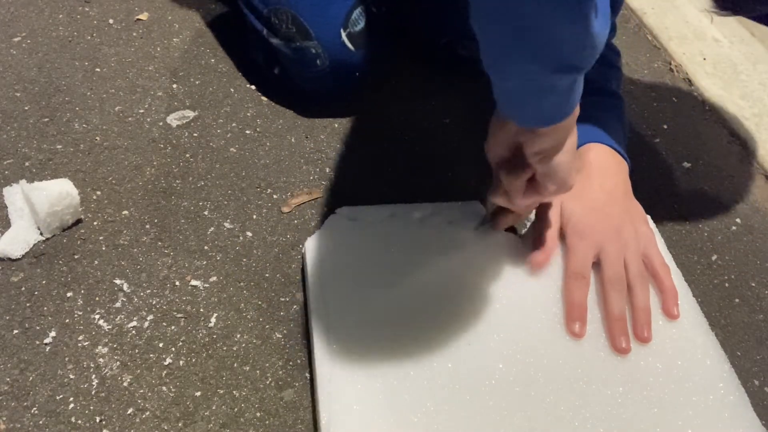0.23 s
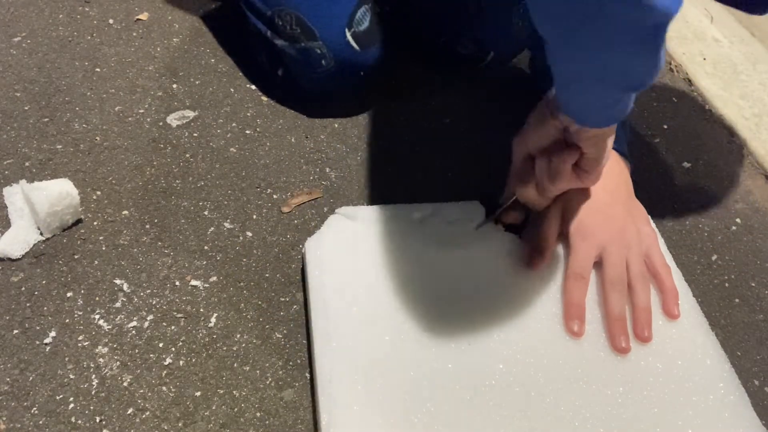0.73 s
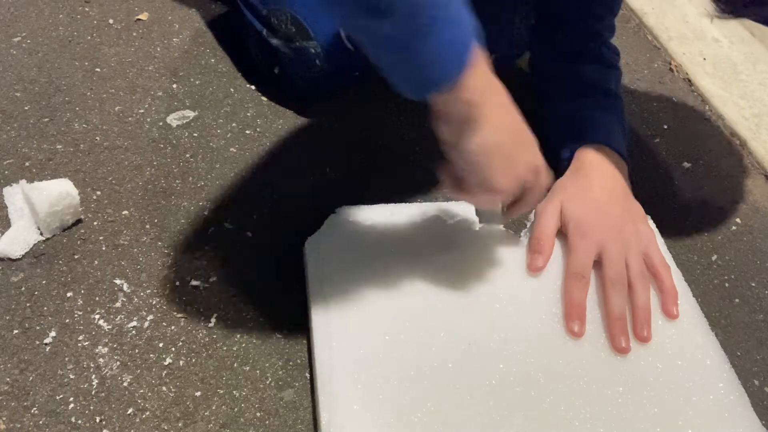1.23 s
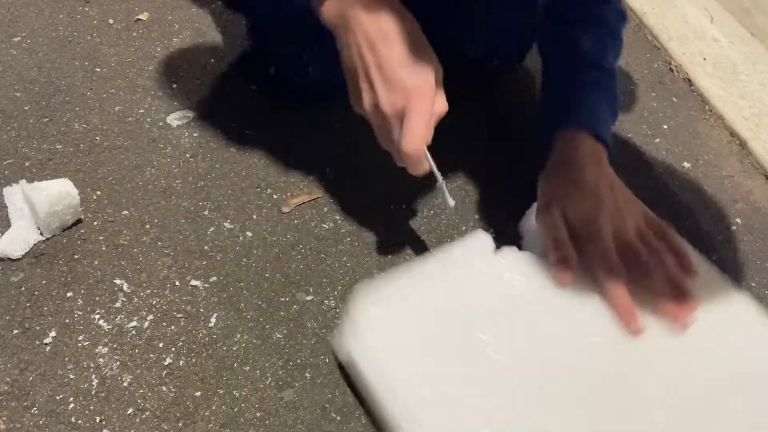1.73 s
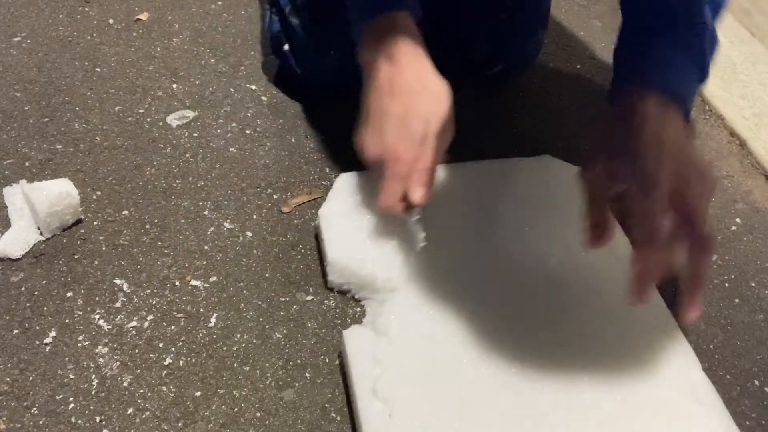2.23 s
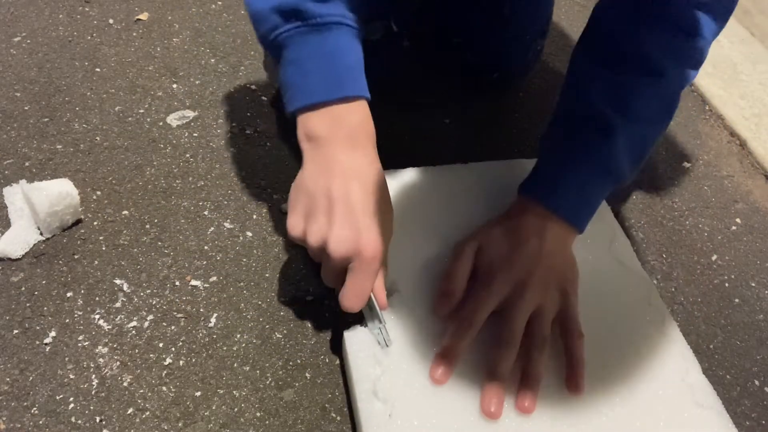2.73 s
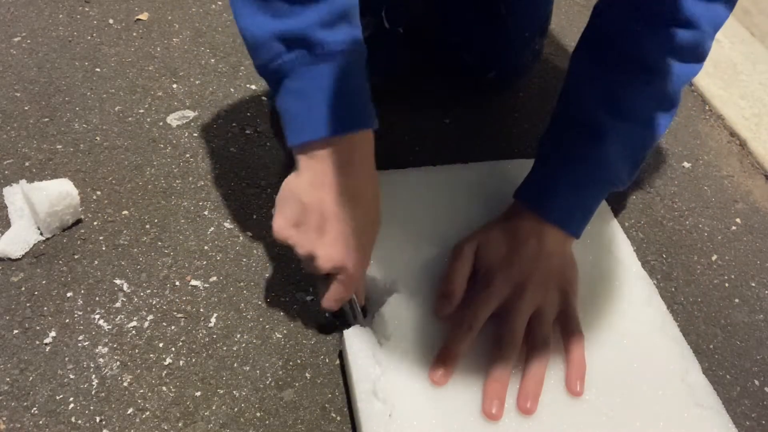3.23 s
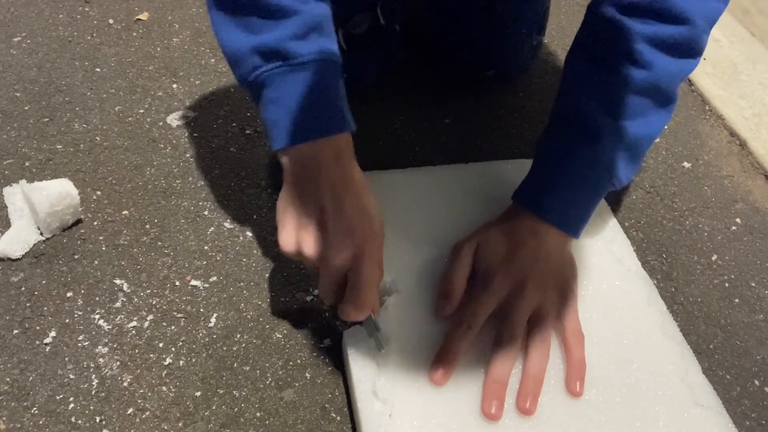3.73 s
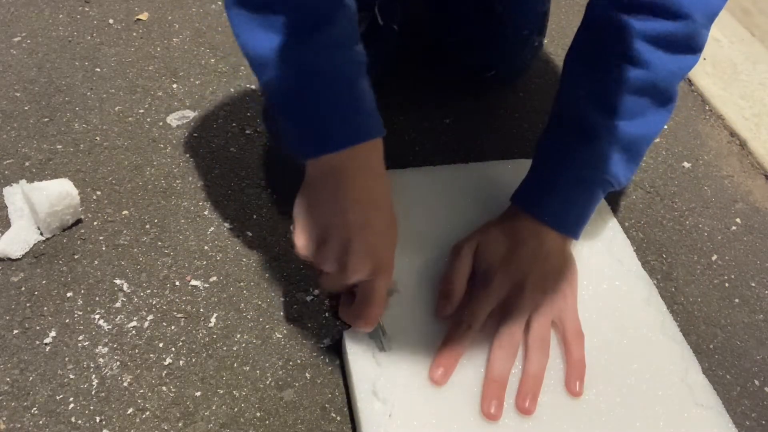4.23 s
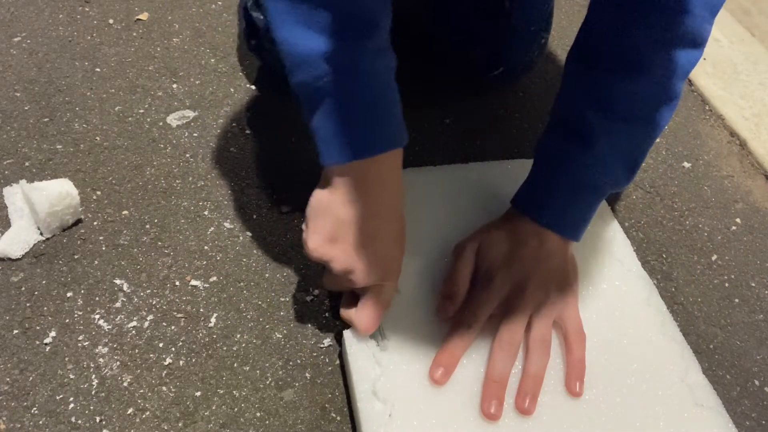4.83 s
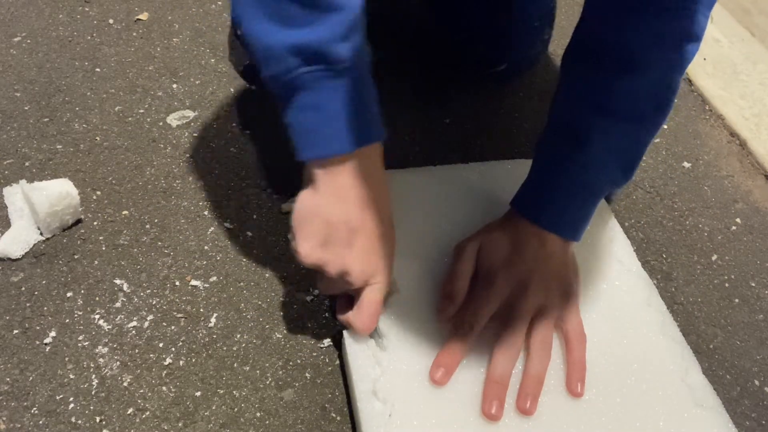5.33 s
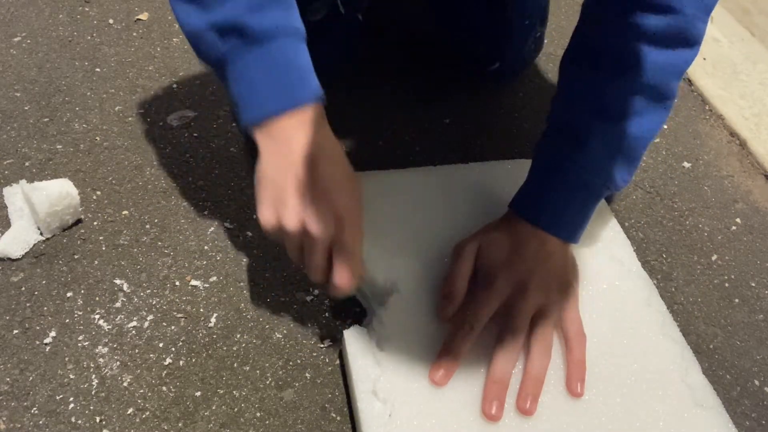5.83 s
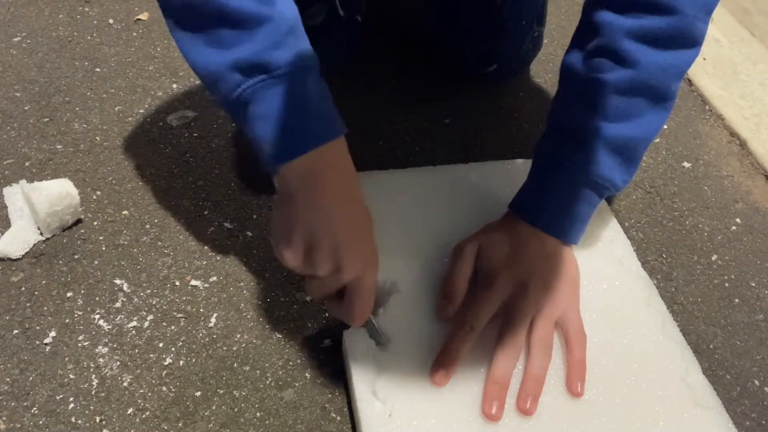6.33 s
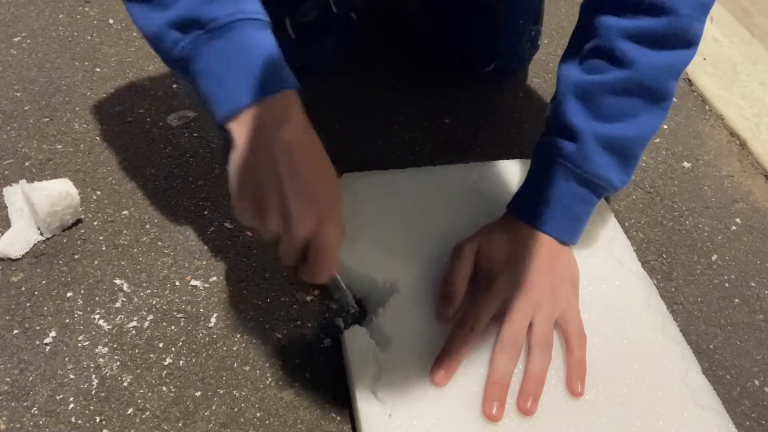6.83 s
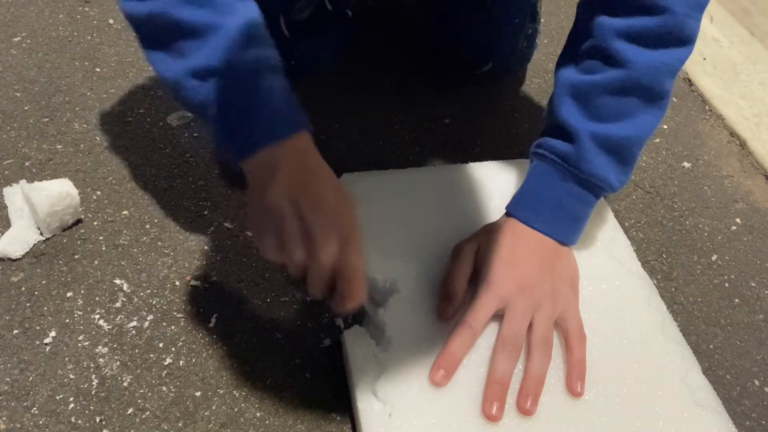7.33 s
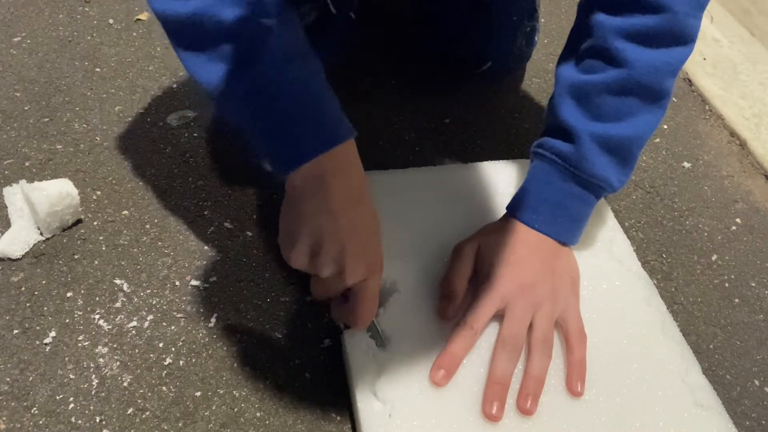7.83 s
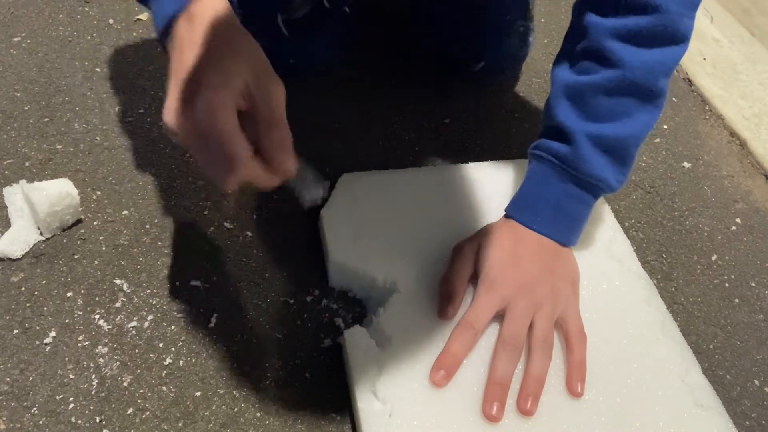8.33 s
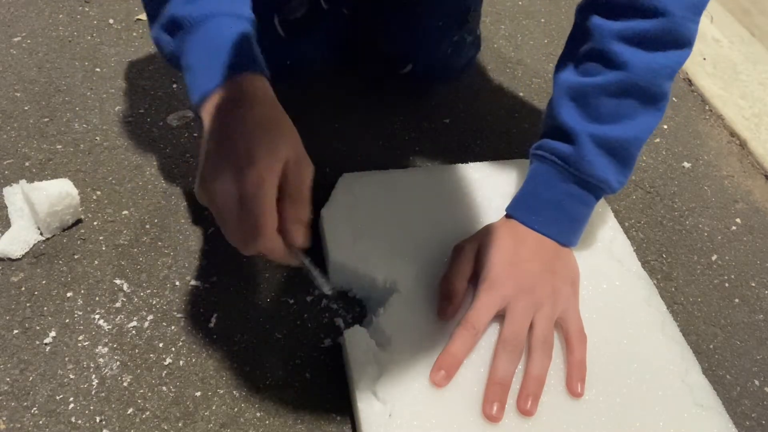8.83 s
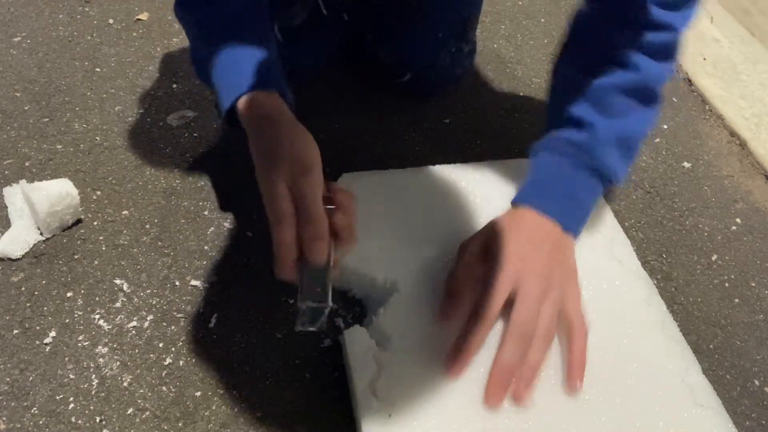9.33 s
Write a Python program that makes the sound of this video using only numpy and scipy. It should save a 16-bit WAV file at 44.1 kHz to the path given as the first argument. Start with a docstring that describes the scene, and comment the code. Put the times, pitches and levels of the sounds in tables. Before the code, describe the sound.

Close up, fingers and blade pick at a polystyrene board with light crackles, snaps and little hollow creaks. The board is dragged round over gritty asphalt with a resonant scrape, then sawn in irregular crunchy strokes and sharp rips. It thins to quiet, with faint knife ticks and a soft nudge. Slight roofed echo, low rumble, stereo microphone.

```python
"""Box cutter in polystyrene

A box cutter saws through a thick polystyrene board on asphalt, under a roof that echoes a little.
Bursting beads (random clicks) make the crackling drag, snaps and rips; grit clicks through resonances make
the board slide when it is turned once and nudged at the end. Stuttering tones are creaks of the flexing foam,
decaying modes the ticks of the lifted knife; filtered noise gives sleeve, low buffeting, bumps and room air."""
import sys
import numpy as np
from scipy import signal
from scipy.fft import rfft, irfft, next_fast_len
from scipy.io import wavfile

SR = 44100
rng = np.random.default_rng(int(sys.argv[2]) if len(sys.argv) > 2 else 0)


def pcm_store(signal):
    """Save signal as 16-bit PCM."""
    levels = np.round(np.clip(np.atleast_2d(signal), -1, 1) * 32767)
    wavfile.write(sys.argv[1], SR, levels.astype(np.int16).T)


N = 423360
TIME = np.arange(N) / SR
SIZE = 2 * next_fast_len(N // 2 + SR // 2)   # padded transform length
HZ = np.maximum(np.arange(SIZE // 2 + 1) * SR / SIZE, 1)


def from_db(db):
    """Logarithmic level: decibels to amplitude gain."""
    return 10 ** (np.asarray(db) / 20)


def rms_one(x):
    """Power normalisation: scale to rms 1."""
    return x / np.sqrt(np.mean(x ** 2) + 1e-20)


def in_time(rows):
    """Linear interpolation: the columns of a curve at every sample."""
    s, *columns = np.transpose(rows)
    return [np.interp(TIME, s, c) for c in columns]


def during(rows):
    """Gating: 1 from the first row's time to the last row's, else 0."""
    return (TIME >= rows[0][0]) & (TIME <= rows[-1][0])


def at_hz(points, hz=HZ):
    """Logarithmic frequency scale: read a table on a log-frequency axis."""
    table_hz, values = np.transpose(points)
    return np.interp(np.log(hz), np.log(table_hz), values)


def bumps(modes):
    """Resonance: summed bell-shaped lifts, in dB, one for each mode."""
    return sum(db / (1 + (2 * (HZ - hz) / width) ** 2) for hz, width, db in modes)


def body(x, colour_db):
    """Minimum-phase filtering: causal colour from the cepstrum; white noise keeps its level."""
    cepstrum = irfft(np.log(rms_one(from_db(colour_db))))
    cepstrum[1:SIZE // 2] *= 2   # fold onto positive time
    cepstrum[SIZE // 2 + 1:] = 0
    response = np.exp(rfft(cepstrum))
    return irfft(rfft(x, SIZE) * response)[..., :N]


def band(x, hz, kind):
    """Band limiting: second-order Butterworth filter."""
    return signal.sosfilt(signal.butter(2, hz, kind, fs=SR, output="sos"), x + 1e-18)


def split(x, hz):
    """Crossover: the parts below and above, which add up to a flat response."""
    return [band(band(x, hz, kind), hz, kind) for kind in ("low", "high")]


def drift(rate):
    """Random modulation: smooth wandering of spread 1, with this many knots a second."""
    knots = rng.standard_normal(N // 10)
    return rms_one(np.interp(TIME * rate, np.arange(len(knots)), knots))


def swells(rows, half_s):
    """Gaussian envelope: a bell-shaped swell for each (s, dB)."""
    return sum(from_db(db) * np.exp(-((TIME - s) / half_s) ** 2) for s, db in rows)


def grains(per_s, spread_db):
    """Shot noise: random clicks of very uneven size and either sign; rms 1."""
    sizes = from_db(spread_db * np.minimum(rng.exponential(1, N), 4))
    happens = rng.random(N) < per_s / SR
    return rms_one(sizes * rng.choice([-1, 1], N) * happens)


def avalanche(fractures, s, swell, fade, squareness=1.3):
    """Fracture avalanche: clicks build up to a peak and die; returns their place and the clicks."""
    span = slice(max(int((s - 5 * swell) * SR), 0), int((s + 5 * fade) * SR) + 2)
    t = TIME[span] - s
    shape = np.exp(-np.abs(t / np.where(t < 0, swell, fade)) ** squareness)
    clicks = fractures[span] * shape
    return span, clicks * np.sqrt(np.sum(shape ** 2) / (np.sum(clicks ** 2) + 1e-12))


# timbre along the cut; dragging takes a share of the treble column:
# t/s, f/Hz of the foam flap beside the blade, relative bass level/dB, relative treble level/dB
CUT = [(.3, 1520, -4, 2.5), (1.2, 1470, 4.5, -2.5), (2.55, 1300, 4.5, -9.5), (2.75, 1330, -5.5, -2),
       (3.1, 1350, -1.5, -1.5), (3.3, 1500, 7.5, -6), (3.6, 1880, 7.5, 4), (3.9, 2210, -8.5, -4),
       (4.3, 2500, -18.5, -3), (4.6, 2670, -40.5, -0.5), (5.0, 2740, -20, 2), (6.0, 1550, 7, -4),
       (6.15, 1630, -2.5, -2), (6.4, 2730, -7, 1), (6.97, 2180, 3.5, -1), (7.3, 2100, 10, -13),
       (7.52, 1940, -16, -7), (7.87, 4600, 3, 1)]
TEAR_DB, TEAR_DULLING = -23.5, 0.2   # typical snap or rip/dB; dB of treble lost per dB stronger


def tearing(tears, thud_db, treble_db, judder_db, squareness):
    """Brittle fracture: bead chains burst at each (s, dB, swell s, fade s); strong tears are duller."""
    fractures = grains(per_s=13000, spread_db=3.5) * from_db(judder_db * drift(450))
    burst, spit = np.zeros((2, N))
    for s, db, swell, fade in tears:
        span, clicks = avalanche(fractures, s, swell, fade, squareness)
        burst[span] += clicks * from_db(db)
        spit[span] += clicks * from_db(db - TEAR_DULLING * (db - TEAR_DB))
    _, bass, treble = in_time(CUT)
    thud = split(burst * from_db(bass + thud_db), 760)[0]
    lower = thud + split(burst, 710)[1]
    upper = split(spit * from_db(treble + treble_db), 3400)[1]
    return split(lower, 5800)[0] + upper


# rips, where the stuck blade breaks through: t/s at the peak, relative level/dB, length/s
RIPS = [(1.228, -37, .013), (2.514, -35.5, 0.016), (2.8405, -29, 0.0066), (2.874, -24, 0.0052),
        (2.901, -13.5, 0.025), (2.947, -27.5, 0.0055), (3.105, -14.5, 0.018), (3.688, -30, 0.0087),
        (3.831, -14.5, 0.0093), (3.965, -11, .02), (4.113, -18.5, 0.0058), (4.131, -20, 0.0042),
        (4.459, -26.5, 0.013), (4.982, -29, 0.011), (6.034, -18.5, 0.0065), (6.119, -21, 0.024),
        (6.414, -14, 0.019), (7.311, -32, 0.0057), (7.881, -29, 0.024)]
RIP_SWELL_SHARE = 0.65   # share of its length for which a rip builds up


def ripping(level_db):
    """Stick-slip release: the stuck blade lets go; the fractures multiply, peak and die away."""
    rips = [(s, db, RIP_SWELL_SHARE * length, (1 - RIP_SWELL_SHARE) * length) for s, db, length in RIPS]
    return from_db(level_db) * tearing(rips, thud_db=0.0, treble_db=7.5, judder_db=2.0, squareness=1.8)


# snaps, where a few beads crack at once: t/s at the peak, relative level/dB
SNAPS = [(0.0757, -36.5), (0.119, -42), (0.1554, -30.5), (0.2557, -22.5), (0.2818, -20.5), (0.379, -32),
         (0.48, -27.5), (.488, -21), (1.0489, -30), (1.0627, -30), (2.6009, -25.5), (2.711, -29),
         (2.7366, -10.5), (2.7429, -11), (3.064, -28), (3.095, -21), (3.283, -29), (3.314, -25.5),
         (3.585, -27), (3.664, -44), (3.7067, -25), (3.7733, -26), (3.8006, -19.5), (3.8734, -24),
         (3.8861, -22.5), (3.9118, -28.5), (3.95, -7), (4.0721, -31.5), (4.107, -16), (4.24, -20.5),
         (4.257, -14.5), (4.439, -43), (4.481, -24.5), (4.529, -24.5), (4.5888, -22), (4.6565, -22.5),
         (4.6639, -11), (4.7304, -37), (4.7449, -23.5), (4.813, -20), (4.835, -21), (4.963, -33.5),
         (4.9705, -19.5), (4.9921, -29.5), (5.023, -25), (5.1378, -33.5), (5.9907, -21.5), (6.0636, -20),
         (6.087, -24), (6.27, -32.5), (6.319, -34), (6.3796, -21), (6.3865, -16.5), (6.9688, -19),
         (7.0604, -25.5), (7.3568, -28), (7.407, -13.5), (7.4167, -16), (7.459, -26), (7.521, -17.5)]
SNAP_SWELL_S, SNAP_FADE_S = .0006, .0016


def snapping(level_db):
    """Impulsive fracture: a few beads crack ahead of the blade, with one sudden start and quick fade."""
    snaps = [(s, db, SNAP_SWELL_S, SNAP_FADE_S) for s, db in SNAPS]
    return from_db(level_db) * tearing(snaps, thud_db=-2.5, treble_db=6.0, judder_db=-1.0, squareness=1.3)


def scattered(clicks, smear_s, count=6):
    """Multipath scattering: each fracture takes one of a few random paths and is smeared briefly."""
    t, route = TIME[:SR // 200], rng.integers(0, count, N)
    paths = rng.standard_normal((count, len(t))) * np.exp(-t / smear_s)
    return rms_one(sum(signal.oaconvolve(clicks * (route == k), path)[:N] for k, path in enumerate(paths)))


# strokes of blade or fingers through the foam: start t/s, end t/s, relative level/dB
DRAG = [(0.042, 0.098, -40.5), (0.128, 0.201, -49), (0.232, 0.292, -41), (0.34, 0.595, -44),
        (0.659, 0.846, -53), (0.856, 1.097, -44), (1.139, 1.257, -55), (2.524, 2.545, -42.5),
        (2.582, 2.656, -38.5), (2.705, 2.804, -38), (2.827, 2.969, -39.5), (3.009, 3.208, -43.5),
        (3.225, 3.344, -36), (3.663, 3.709, -33), (3.768, 3.933, -41.5), (4.084, 4.185, -41.5),
        (4.22, 4.306, -34), (4.345, 4.388, -37), (4.434, 4.526, -40), (4.574, 4.709, -40),
        (4.73, 5.03, -40), (5.106, 5.345, -52), (5.358, 5.444, -41), (5.841, 5.9, -44.5),
        (5.943, 6.154, -40), (6.255, 6.403, -45.5), (6.5, 6.612, -48), (6.625, 6.706, -41),
        (6.906, 7.01, -45), (7.044, 7.052, -31.5), (7.317, 7.535, -44.5), (7.568, 7.816, -51.5),
        (7.849, 7.904, -47.5)]
STROKE_DB, STROKE_DULLING = -40, 0.26   # typical stroke/dB; dB of treble lost per dB harder
PICKING_END_S = 1.4   # until then crumbs are only picked off the edge


def dragging(level_db, clump_db, hiss_db, picking_hiss_db, attack_s, release_s, treble_db, follows_cut,
             resting_db):
    """Frictional crackle: beads pop in clumps over hiss; light strokes are brightest, picking smoothest."""
    pops = grains(per_s=1900, spread_db=5.5) * from_db(clump_db * np.minimum(drift(130), 1.5))
    pops = scattered(pops, smear_s=0.00057, count=8)
    hiss = from_db(np.where(TIME < PICKING_END_S, picking_hiss_db, hiss_db))
    crackle = (pops + hiss * rng.standard_normal(N)) / np.hypot(1, hiss)
    pressure = from_db(resting_db) * during(DRAG)   # between strokes the hand still rubs the foam faintly
    bright = .5 * pressure
    for start, end, db in DRAG:
        span = slice(max(int((start - .05) * SR), 0), int((end + .05) * SR))
        t = TIME[span]
        before, after = np.maximum(start - t, 0), np.maximum(t - end, 0)
        stroke = from_db(db) * np.exp(-before / attack_s - after / release_s)
        pressure[span] += stroke
        bright[span] += stroke * from_db(-STROKE_DULLING * (db - STROKE_DB))
    _, _, treble = in_time(CUT)
    low, high = split(crackle, 4200)
    return from_db(level_db) * (low * pressure + high * bright * from_db(treble_db + follows_cut * treble))


def flap(x, lift, width_hz, size=256):
    """Moving resonance: a two-pole filter follows the cut's pitch, stepped block by block."""
    ring, state, pitch = np.zeros(N), np.zeros(2), in_time(CUT)[0]
    r = np.exp(-np.pi * width_hz / SR)   # pole radius
    zeros = [(1 - r * r) / 2, 0, (r * r - 1) / 2]
    for i in range(0, N, size):
        poles = [1, -2 * r * np.cos(2 * np.pi * pitch[i] / SR), r * r]
        ring[i:i + size], state = signal.lfilter(zeros, poles, x[i:i + size], zi=state)
    return x + lift * ring


# colour of the cut board: f/Hz, relative level/dB
CUT_COLOUR = [(80, -49.5), (200, -10.5), (300, -10), (450, -9), (700, -8.5), (1000, -0.5), (1400, -2),
              (2300, -4.5), (3200, -4), (4600, -5), (6500, -12.5), (9000, -7), (13500, -7.5), (15500, -19)]
# resonances of the cut board: f/Hz, width/Hz, lift/dB
CUT_MODES = [(500, 120, 6.5), (757, 78, 5), (1044, 180, -7.5), (1365, 310, 2.5), (1647, 38, 2.5),
             (2120, 130, 8.5), (2240, 100, -3.5), (2544, 200, 7), (3380, 70, 4), (4600, 130, -1.5),
             (7440, 4100, 3), (9480, 1000, 0.5)]


def cut_board(x):
    """Plate radiation: the flap and then the board's fixed resonances colour tears and drag."""
    return body(flap(x, lift=0.49, width_hz=520), at_hz(CUT_COLOUR) + bumps(CUT_MODES))


def rubbing(curve, crackle, treble_db):
    """Sliding friction: crackle under a movement whose strength and brightness change."""
    level, treble = in_time(curve)
    low, high = split(crackle, 3300)
    brightness = from_db(np.minimum(treble, 3) + treble_db)
    return during(curve) * from_db(level) * (low + high * brightness)


# the board sliding over the asphalt, one curve as it is turned, one as it is nudged:
# t/s, relative level/dB, treble level/dB relative to that (held to 3 at most, then offset)
SLIDES = [
    [(1.28, -73, 2), (1.45, -67, 30), (1.55, -36, -2.5), (1.66, -29, 0), (1.76, -33.5, -7),
     (1.84, -30, -3.5), (1.98, -28.5, -5.5), (2.03, -37, -2.5), (2.22, -53, -1.5), (2.48, -70.5, -23)],
    [(8.95, -78, -3.5), (9.22, -57, -4), (9.34, -43.5, -5), (9.39, -58.5, -4), (9.44, -53.5, 14),
     (9.48, -87, -3)],
]
# its edge catching on grit: t/s at the peak, relative level/dB
CATCHES = [(1.5664, -33), (1.638, -25.5), (1.654, -20.5), (1.693, -22.5), (1.7909, -29), (1.829, -23),
           (1.8895, -16.5), (1.933, -21.5), (1.978, -14), (2.01, -21.5), (2.057, -20.5), (2.087, -26.5),
           (2.171, -37), (9.333, -43), (9.429, -58)]
CATCH_SWELL_S, CATCH_FADE_S = 0.00396, .0055
# colour of the sliding board: f/Hz, relative level/dB
SLIDE_COLOUR = [(70, -35), (200, -10), (350, -17), (600, -15.5), (950, -8.5), (1350, -2), (2000, -7.5),
                (3000, -13), (4500, -10.5), (6500, -15), (9000, -7.5), (13500, -10.5), (15500, -19.5)]
# resonances of the sliding board: f/Hz, width/Hz, lift/dB
SLIDE_MODES = [(344.5, 17, 15), (631, 35, 0), (820, 36, 5), (1030, 16.4, 14.5), (1036, 110, -6),
               (1270, 65, 5), (1740, 28, 6.5), (2148, 76, 4), (2500, 53, 6.5), (3520, 49, 3.5)]


def sliding(level_db, catch_db, judder_db):
    """Forced plate vibration: grit rasps the underside; catches jolt the board like a drum skin."""
    grit = rms_one(grains(per_s=2600, spread_db=2.5) * from_db(judder_db * np.minimum(drift(130), 1.5)))
    rasp = from_db(level_db) * sum(rubbing(curve, grit, treble_db=6.5) for curve in SLIDES)
    jolts = np.zeros(N)
    for s, db in CATCHES:
        span, clicks = avalanche(grit, s, CATCH_SWELL_S, CATCH_FADE_S)
        jolts[span] += clicks * from_db(db + catch_db)
    contact = band(rasp, 330, "high") + band(jolts, 6000, "low")
    return body(contact, at_hz(SLIDE_COLOUR) + bumps(SLIDE_MODES))


# resonances as the board glides to rest: f/Hz, width/Hz, lift/dB
GLIDE_MODES = [(626, 340, 30.5), (1760, 400, 27.5), (3200, 390, 16.5), (4450, 720, 22.5)]
# when it sings: t/s at the peak, level/dB
GLIDE = [(2.35, -62)]
GLIDE_HALF_S = 0.16   # the swell falls to 1/e this far from its peak


def gliding():
    """Friction-excited resonance: the lightly rubbed board sings faintly in a few resonances."""
    return swells(GLIDE, GLIDE_HALF_S) * body(rng.standard_normal(N), bumps(GLIDE_MODES))


# hollow creaks of the flexing board: start t/s, nominal f/Hz, relative level/dB,
# length/s (loudest halfway through, with a tail beyond)
FLEX = [(.06, 423, -40.5, .014), (0.146, 417, -32, .012), (0.269, 422, -36.5, .013),
        (0.374, 492, -40, .018), (0.482, 500, -33, .013), (.583, 487, -39, .022),
        (0.862, 381.5, -48.5, .045), (0.989, 415.4, -52.5, .07), (3.131, 531, -56, .041),
        (5.401, 404, -41.5, .013)]
CREAK_SAG = .12   # share of its pitch, roughly, that a creak loses over its length


def flexing(level_db, sag, waver, rough_db, overtone_db):
    """Stick-slip creak: bent foam gives way in a stutter that sinks in pitch as the strain eases."""
    out, t, wobble = np.zeros(N), TIME[:SR // 4], drift(400)
    stutter = rms_one(from_db(rough_db * np.minimum(drift(300), 1.5)))
    for s, hz, db, length in FLEX:
        span = slice(int(s * SR), int(s * SR) + len(t))
        age = t / length
        pitch = hz * np.exp(sag * (.5 - np.minimum(age, 2)) + waver * wobble[span])
        phase = 2 * np.pi * np.cumsum(pitch) / SR
        tone = np.sin(phase) + from_db(overtone_db) * np.sin(3 * phase)
        envelope = 2 * age * np.exp(1 - 2 * age)
        out[span] += from_db(db + level_db) * envelope * stutter[span] * tone
    return out


# the loose blade in its handle: t/s, relative level/dB, pitch ratio to the modes [1]
TICKS = [(8.0732, -43, 1), (8.613, -49.5, 0.98), (8.7715, -40, 1), (8.9668, -51, .93),
         (9.0289, -45.5, 1.06)]
# modes of the knife: f/Hz before the pitch ratio, relative level/dB, t60/s
KNIFE = [(1850, -20, 0.025), (2025, 7.5, 0.029), (2100, -26, 0.018), (2990, -12, 0.028), (4290, 7.5, 0.016),
         (6140, -1, 0.016), (6900, -9, 0.037)]


def knife(level_db, rattle_db, rattle_t60):
    """Modal decay: each tick sums the knife's dying modes, of varied strengths, and a noisy rattle."""
    out, t = np.zeros(N), TIME[:SR // 10]
    for s, db, pitch in TICKS:
        ring = np.zeros(len(t))
        for hz, mode_db, t60 in KNIFE:
            strength = from_db(mode_db + rng.normal(0, 1.1) - 60 * t / t60)
            ring += strength * np.sin(2 * np.pi * pitch * hz * t)
        rattle = band(rng.standard_normal(len(t)), 10650, "low")
        ring += rattle * from_db(rattle_db - 60 * t / rattle_t60)
        out[int(s * SR):int(s * SR) + len(t)] += from_db(db + level_db) * ring / np.abs(ring).max()
    return out


# swings of the arm that rustle the sleeve: t/s at the peak, relative level/dB
SLEEVE = [(3.45, -81), (5.6, -53), (5.78, -65), (6.8, -70), (7.97, -54), (8.33, -72.5), (8.58, -68.5),
          (8.82, -64), (9.05, -67)]
SWING_HALF_S = 0.035   # a swing falls to 1/e this far from its peak


def sleeve(level_db, steady_db, flutter_db):
    """Fabric friction: the jacket rustles faintly all the time, and more when the arm swings."""
    rustle = band(grains(per_s=2000, spread_db=3.0), [2000, 9000], "band")
    motion = from_db(steady_db) + from_db(level_db) * swells(SLEEVE, SWING_HALF_S)
    return rms_one(rustle) * motion * from_db(flutter_db * drift(40))


def breadth(x, level_db, smear_s, shifts_per_s, count=6):
    """Extended source: many spots radiate in turn, so each port hears a different, shifting blur."""
    t, out = TIME[:SR // 100], 0
    for _ in range(count):
        blur = band(rng.standard_normal((2, len(t))), [1500, 8000], "band") * np.exp(-t / smear_s)
        blur = rms_one(blur) / np.sqrt(len(t) * count)
        out = out + signal.oaconvolve((x * drift(shifts_per_s))[None], blur)[:, :N]
    return from_db(level_db) * out


# level balance of the two microphone ports: f/Hz, left-right level/dB
PORT_BALANCE = [(100, -0.5), (400, 0), (800, -1.5), (1800, -6), (2800, -3), (4200, -3), (9000, 0)]
# phase between the ports: f/Hz, lead of the left/rad
PORT_PHASE = [(100, 0), (500, -.55), (1100, -.8), (1900, -.85), (3100, -1.5), (4500, -1.9), (5700, -2.6),
              (6900, -3), (8300, -4.6), (10500, -4.8), (13400, -5.1)]


def ports(x):
    """Interaural-style difference: direct sound is earlier and mostly louder in the right port."""
    half = from_db(at_hz(PORT_BALANCE) / 2) * np.exp(.5j * at_hz(PORT_PHASE))
    return irfft(rfft(x, SIZE) * np.array([half, 1 / half]))[:, :N]


# reverberation time: f/Hz, t60/s
HALL_T60 = [(300, 0.91), (800, 0.3), (2000, 0.28), (5000, 0.24), (10000, 0.12), (16000, 0.29)]


def hall(x, early_db, early_t60, tail_db):
    """Reverberation: quick scatter from ground and kneeling body, then a faint tail, longest in the bass."""
    t, edges = TIME[:SR], np.geomspace(150, 18000, 8)
    white, tail = rng.standard_normal((2, 2, SR)), np.zeros((2, SR))
    for k, (lo, hi) in enumerate(zip(edges, edges[1:])):
        decay = from_db(-60 * t / at_hz(HALL_T60, np.sqrt(lo * hi)))
        tail += band(white[k % 2], [lo, hi], "band") * decay
    tail *= t > .012
    early = band(rng.standard_normal((2, SR)), 9100, "low") * from_db(-60 * t / early_t60) * (t > .002)
    response = (from_db(early_db) * rms_one(early) + from_db(tail_db) * rms_one(tail)) / np.sqrt(SR)
    return irfft(rfft(x, SIZE) * rfft(response, SIZE))[:, :N]


# low buffeting at the microphone: t/s, relative level/dB
RUMBLE = [(0.0, -64.5), (2.17, -57.5), (5.56, -61), (5.75, -53.5), (7.11, -60.5), (7.25, -58), (8.5, -65.5),
          (9.6, -56)]
# colour of the buffeting: f/Hz, relative level/dB
RUMBLE_COLOUR = [(12, -31), (20, -25), (54, -3.5), (161, -18.5), (238, -26), (269, -37.5), (304, -23.5),
                 (343, -40.5), (500, -42), (650, -68), (1100, -120)]
# dull bumps of handling: t/s at the peak, relative level/dB
BUMPS = [(.16, -51), (2.5, -43), (3.56, -45.5), (4.15, -50), (4.685, -45.5), (5.025, -47), (5.618, -41.5),
         (6.123, -40.5), (6.6, -46), (7.22, -44.5), (8.27, -53.5), (9.13, -49.5)]
BUMP_HALF_S = 0.04   # a bump falls to 1/e this far from its peak
# colour of the room air: f/Hz, relative level/dB
AIR_COLOUR = [(100, 2.5), (300, -10), (600, -12), (1200, -22), (3000, -26.5), (8000, -28.5), (16000, -33.5)]


def background(rumble_db, bump_db, air_db, apart_db):
    """Coherent and diffuse noise: buffeting nearly alike and bumps alike in both ports, and room air."""
    buffets = rng.standard_normal(N) + from_db(apart_db) * rng.standard_normal((2, N))
    rumble = from_db(in_time(RUMBLE)[0] + rumble_db) * body(buffets, at_hz(RUMBLE_COLOUR))
    push = from_db(bump_db) * swells(BUMPS, BUMP_HALF_S)
    thumps = push * rms_one(band(rng.standard_normal(N), [32, 80], "band"))
    air = from_db(air_db) * body(rng.standard_normal((2, N)), at_hz(AIR_COLOUR))
    return rumble + thumps + air


def scene():
    """Superposition: tears and drag sound through the board; everything near goes through the hall."""
    tears = snapping(level_db=-0.38) + ripping(level_db=-1.7)
    drag = dragging(level_db=-4.0, clump_db=5.5, hiss_db=-9.5, picking_hiss_db=-2.5, attack_s=0.0027,
                    release_s=.008, resting_db=-68.0, treble_db=5.0, follows_cut=0.29)
    near = cut_board(tears + drag)
    near = near + sliding(level_db=0.0, catch_db=-0.2, judder_db=2.5) + gliding()
    near = near + flexing(level_db=-1.0, sag=CREAK_SAG, waver=.17, rough_db=6.0, overtone_db=-3.0)
    near = near + knife(level_db=3.0, rattle_db=0.5, rattle_t60=0.047)
    near = near + sleeve(level_db=-5.0, steady_db=-80.0, flutter_db=6.5)
    room = hall(near, early_db=-11.5, early_t60=0.054, tail_db=-20.0)
    room = room + breadth(near, level_db=-10.0, smear_s=0.00092, shifts_per_s=25)
    return ports(near) + room + background(rumble_db=1.9, bump_db=0.0, air_db=-69.5, apart_db=-13.0)


# notch of the microphone ports: f/Hz, width/Hz, lift/dB
PORT_NOTCH = [(11336, 830, -21)]
CUTOFF_HZ = 16000


def record(dry):
    """Notch and soft saturation: the ports swallow a treble band, peaks are rounded, the top is cut."""
    heard = .9 * np.tanh(body(dry, bumps(PORT_NOTCH)) / .9)
    return signal.sosfilt(signal.ellip(10, .3, 70, CUTOFF_HZ, fs=SR, output="sos"), heard)


dry = scene()
out = record(dry)
pcm_store(out)
```